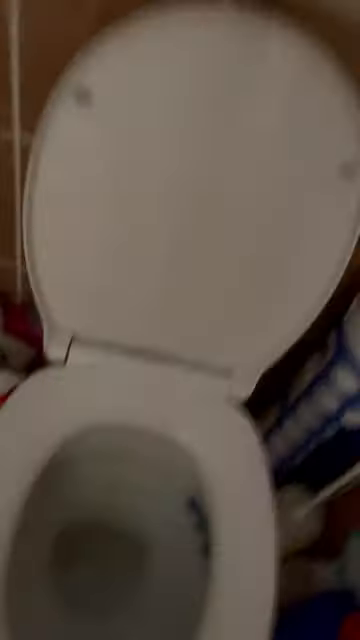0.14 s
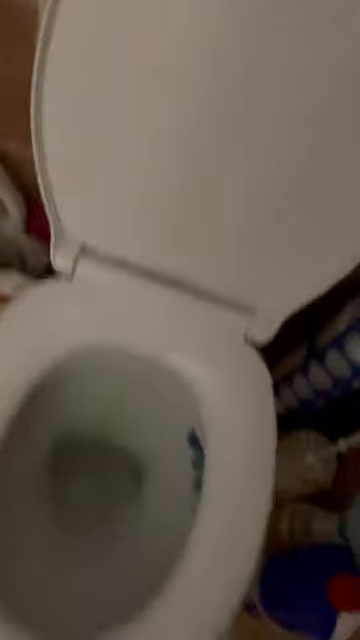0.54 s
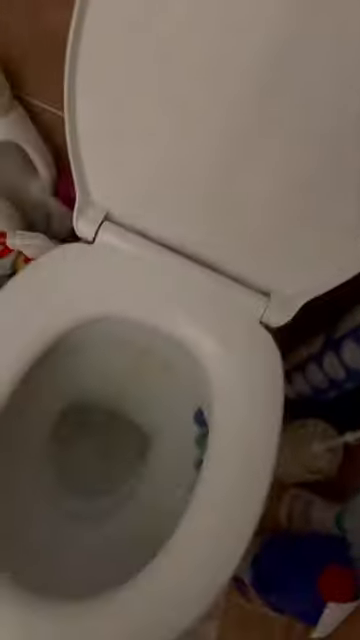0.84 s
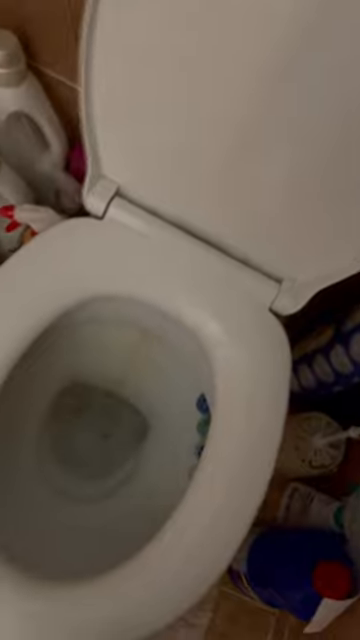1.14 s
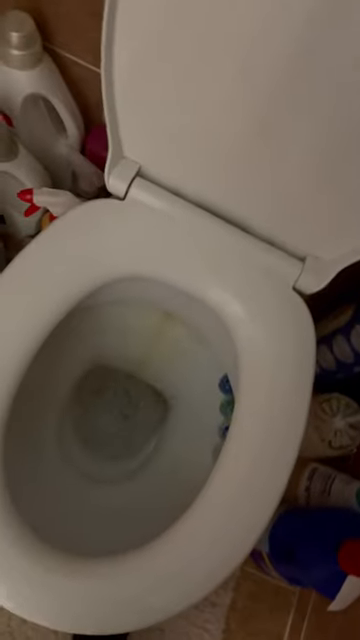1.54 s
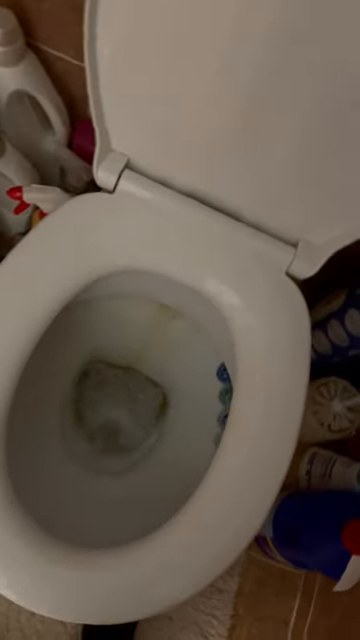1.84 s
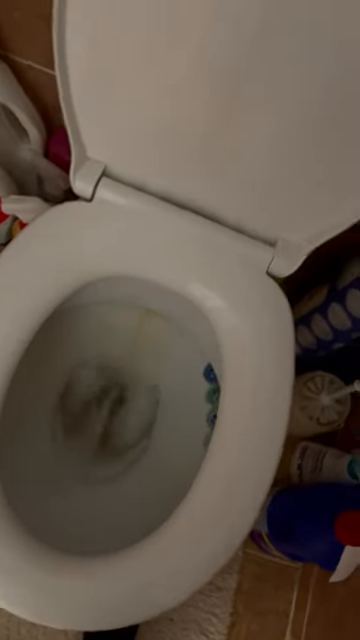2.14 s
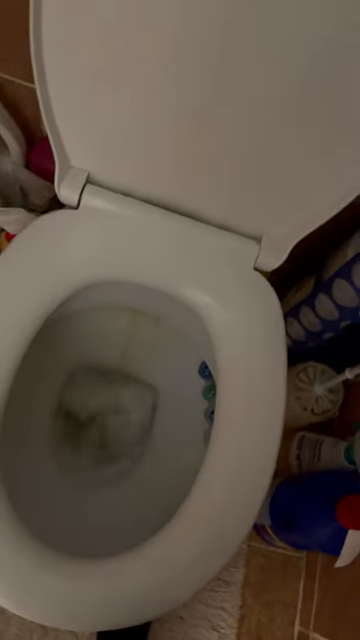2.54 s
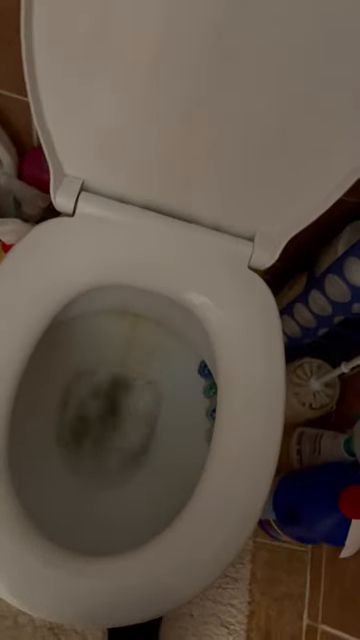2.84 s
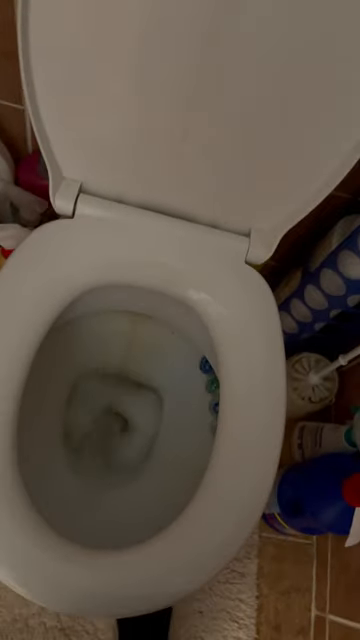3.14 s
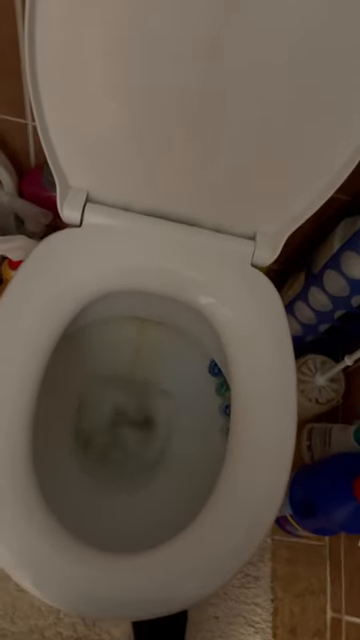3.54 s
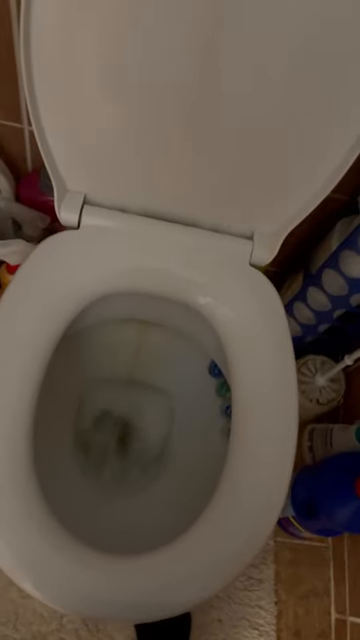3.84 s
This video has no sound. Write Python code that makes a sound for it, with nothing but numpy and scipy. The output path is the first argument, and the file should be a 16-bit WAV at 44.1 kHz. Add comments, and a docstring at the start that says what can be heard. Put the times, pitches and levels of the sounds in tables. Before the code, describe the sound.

Toilet flush heard up close, handle rattling and thumping before water gushes and churns in a bathroom

```python
"""A lever clicks and scrapes, then a toilet flushes in a small tiled bathroom, heard from just above the bowl.
Bursts of random impacts make the lever; decaying modes and short notes make the cistern's thumps and gulps.
The filling flush pipe sings as a wavering sine; coloured drops and rising chirps make the water spray from
the rim, splash and churn in the bowl. Big bubbles are swelling sines; room noise and a low rumble lie beneath."""
import sys
import numpy as np
from scipy import signal
from scipy.fft import rfft, irfft, next_fast_len
from scipy.io import wavfile
from scipy.ndimage import uniform_filter1d

SR = 44100
rng = np.random.default_rng(int(sys.argv[2]) if len(sys.argv) > 2 else 0)


def to_wav(sig):
    """Store sig (one row per channel, or 1-D mono) as 16-bit WAV at the path in sys.argv[1].

    Samples outside -1..1 are clipped; the rate is SR.
    """
    pcm = np.clip(np.atleast_2d(sig), -1, 1) * 32767
    pcm = np.round(pcm).astype(np.int16)
    wavfile.write(sys.argv[1], SR, pcm.T)  # frames by channels


N = 176400  # samples, 4 s

# Spectrum of water slapping. Each row: frequency in Hz, relative level in dB.
SLAP_COLOUR = [(500,-14),(800,5),(1400,-0.5),(2200,-1.5),(3000,-9.5),(6000,-15),(10000,-30)]


def undb(db):
    """A level in decibels is twenty times the logarithm of the amplitude gain returned."""
    return 10 ** (np.asarray(db) / 20)


def unit(x):
    """Dividing by the root mean square gives a signal unit effective amplitude."""
    return x / np.sqrt(np.mean(x ** 2) + 1e-20)


def curve(rows, column=1):
    """A slow gain envelope: levels in dB interpolated linearly over time, from rows of (s, dB, ..)."""
    rows = np.array(rows)
    return undb(np.interp(np.arange(N) / SR, rows[:, 0], rows[:, column]))


def colour(x, points):
    """Minimum-phase filtering: folding the cepstrum makes a causal response through (Hz, dB); rms 1."""
    size = next_fast_len(N + N // 10, real=True) * 2
    hz, db = np.array(points).T
    octave = np.log2(np.maximum(np.arange(size // 2 + 1) * SR / size, 1))
    beyond = np.abs(octave - np.clip(octave, np.log2(hz[0]), np.log2(hz[-1])))
    # outside the points the level falls 20 dB per octave, for two octaves
    level_db = np.interp(octave, np.log2(hz), db) - 20 * np.minimum(beyond, 2)
    cepstrum = irfft(np.log(undb(level_db)))
    cepstrum[1:size // 2] *= 2
    cepstrum[size // 2 + 1:] = 0
    response = np.exp(rfft(cepstrum))
    return unit(irfft(rfft(x, size) * response)[:N])


def noise(points):
    """White noise holds all frequencies equally; a filter gives it its colour."""
    return colour(rng.standard_normal(N), points)


def decay(t, t60):
    """Exponential decay, by 60 dB in t60 seconds."""
    return np.exp(-np.log(1000) * t / t60)


def ring(x, modes):
    """Modal synthesis: a force is convolved with decaying cosines, rows of (Hz, dB, t60 s)."""
    t = np.arange(SR) / SR
    response = sum(undb(db) * np.cos(2 * np.pi * hz * t) * decay(t, t60) for hz, db, t60 in modes)
    return signal.fftconvolve(x, response)[:N]


def walk(count):
    """Slow random fluctuation: smoothed random steps, count of them a second; rms 1."""
    step = SR // count
    steps = np.repeat(rng.standard_normal(N // step + 1), step)
    return unit(uniform_filter1d(steps, step)[:N])


def drops(rate, spread_db):
    """A Poisson-like shower: independent impulses, rate a second on average, of random sign and uneven size."""
    size = undb(spread_db * np.clip(rng.standard_normal(N), -2.5, 2.5))
    return (rng.random(N) < rate / SR) * size * rng.choice([-1, 1], N)


def chirps(rate, low_hz, high_hz, cycles, spread_db):
    """Bubble resonance: a crowd of decaying notes rising in pitch, each dying by 1/e in the given cycles."""
    glide = 0.053  # share of the starting pitch gained in one 1/e decay time
    out = np.zeros(N + SR)
    candidates = np.column_stack([rng.random((6000, 3)), rng.standard_normal(6000)])
    for at, pitch, keep, size in candidates:
        if keep < rate * N / SR / 6000:  # leaves about rate chirps a second
            hz = low_hz * (high_hz / low_hz) ** pitch
            age = np.arange(int(5 * cycles * SR / hz)) * hz / SR / cycles  # in decay times
            tone = np.sin(2 * np.pi * cycles * age * (1 + glide * age / 2))
            i = int(at * N)
            out[i:i + len(age)] += undb(spread_db * min(size, 2)) * hz * np.exp(-age) * tone
    return out[:N]


def room(x, wet_db):
    """Diffuse reverberation: direct sound plus decaying noise, whose channels differ most in mid register."""
    t = np.arange(SR // 2) / SR
    mid, side = rng.standard_normal((2, len(t)))
    side = signal.sosfilt(signal.butter(1, [450, 5000], "band", fs=SR, output="sos"), side)
    tail = mid + 0.58 * side * np.array([[1], [-1]])
    body = signal.sosfilt(signal.butter(2, 3000, fs=SR, output="sos"), tail)
    treble = tail - body
    tail = body * decay(t, t60=0.32) + treble * decay(t, t60=0.21)
    tail *= t > .003  # the tail starts 3 ms after the direct sound
    tail *= undb(wet_db) / np.sqrt(np.sum(tail ** 2) / 2)
    wet = signal.fftconvolve(x[None], tail, axes=1)[:, :N]
    return (x + wet) / np.sqrt(1 + undb(wet_db) ** 2)


def water():
    """Many small impacts and bubble notes merge: the pool churns and gurgles, drops splash, spray hits porcelain."""
    # Each row: time in seconds, churn level in dB, gurgle in dB, splash in dB, spray in dB.
    flow = [(.58,-69,-101,-74,-86),(.68,-44,-35,-47,-45.5),(.9,-42,-59,-53,-50.5),(1.12,-59,-56,-59.5,-51.5),(1.24,-45,-51,-54.5,-44),
            (1.42,-48,-51.5,-44.5,-45.5),(1.56,-49.5,-42,-42,-42.5),(1.66,-42.5,-36.5,-40,-43.5),(1.76,-43,-39.5,-43.5,-40),(1.86,-43.5,-36.5,-37,-37.5),
            (2.05,-40.5,-38,-39.5,-35),(2.3,-41,-34.5,-38.5,-37.5),(2.65,-42.5,-36,-38.5,-37.5),(3.05,-42,-37,-40.5,-40),(3.4,-43.5,-37,-39.5,-39.5),(4,-42.5,-34,-40,-40)]
    # Spectra of the four registers. Each row: frequency in Hz, relative level in dB.
    churn_colour = [(58,-10),(78,-4),(130,-3),(166,-16.5),(200,4),(228,-10),(258,9.5),(278,-9),(305,7.5),(350,-3.5),(420,-16.5),(700,-37.5)]
    gurgle_colour = [(330,-47.5),(450,-13.5),(505,-10),(540,-13),(730,0.5),(800,-1.5),(920,3),(1100,-3.5),(1400,-6),(1900,-20)]
    splash_colour = [(800,-17),(1500,-1),(2000,-0.5),(2350,2.5),(2750,-0.5),(3050,1.5),(3500,-2.5),(4300,-3),(6000,-13.5)]
    spray_colour = [(2500,-13),(4500,-5),(6000,-1),(8500,-2),(10400,2.5),(11300,-2),(12200,-11),(13600,-23),(15500,-63)]

    surge = undb(1.0 * walk(count=24))  # 1 dB rms, shared by all registers
    churn = colour(drops(rate=900, spread_db=2.0), churn_colour) * curve(flow, column=1)
    gurgle = chirps(rate=320, low_hz=446.2, high_hz=2036, cycles=5.1, spread_db=3)
    gurgle = colour(gurgle, gurgle_colour) * curve(flow, column=2)

    tinkle = unit(chirps(rate=430, low_hz=1374, high_hz=5160, cycles=10.6, spread_db=3.1))
    patter = unit(drops(rate=1300, spread_db=0.9)) + undb(-5.5) * tinkle
    splash = colour(patter, splash_colour) * curve(flow, column=3) * undb(0.38 * walk(count=50))

    fine_bubbles = unit(chirps(rate=600, low_hz=4000, high_hz=12530, cycles=10, spread_db=4.8))
    fizz = unit(drops(rate=1600, spread_db=5)) + undb(-2) * fine_bubbles
    spray = colour(fizz, spray_colour) * curve(flow, column=4) * undb(1.5 * walk(count=50))

    low = room(churn * surge, wet_db=-12.0) + room(gurgle * surge, wet_db=-2)
    return low + room(splash * surge, wet_db=-3.0) + room(spray * surge, wet_db=-3.0)


def big_bubbles():
    """Air pockets as resonators: each bursting bubble is a sine that swells and dies as its pitch rises; a low
    note of the cistern near 260 Hz is made the same way."""
    # Each row: time of the peak in seconds, pitch there in Hz, level in dB, swell time scale in seconds. The #
    # first row is the cistern's low note just after its thump at 0.866 s; the rest are bubbles.
    bubbles = [(0.871,260.4,-22.5,0.00695),(1.46,2020,-32,0.0044),(1.578,1780,-34,.006),(1.649,995,-25.5,0.0034),(1.794,1356,-22.5,0.0016),(1.831,867,-18.5,0.0031),(1.85,917,-23.5,0.0042),
               (1.881,4110,-21,0.0017),(2.065,924,-19,.0015),(2.078,945,-16.5,0.0034),(2.093,1153,-22,.003),(2.2535,908,-22.5,0.0019),(2.27,646,-28,.005),(2.578,102,-43,0.029),(2.806,2330,-28,0.0022),(2.837,1196,-26.5,0.0023),
               (2.897,645,-28.5,0.0048),(2.942,1020,-27,0.0065),(2.991,1016,-29,.003),(3.015,980,-23,.004),(3.048,964,-20.5,0.003),(3.068,2290,-17.5,0.0015),(3.079,1004,-24,0.0024),(3.081,1900,-26,.002),(3.285,885,-29,.006),(3.381,806,-25.5,0.0064),
               (3.45,958,-18.5,.0025),(3.619,2360,-27,0.0022),(3.666,525,-34,0.0042),(3.672,737,-30,0.0066),(3.672,297,-32.5,0.0087),(3.798,950,-17.5,0.0018),(3.859,920,-20.5,0.0014),(3.9,890,-33.5,.005)]
    out = np.zeros(N + SR)
    for at, hz, db, swell in bubbles:
        lead = int(4 * swell * SR)
        age = np.arange(-lead, int(8 * swell * SR)) / SR
        start = int(at * SR) - lead
        size = undb(db) / np.cosh(1.4 * age / swell)
        pitch = hz * (1 + 0.043 * np.tanh(age / swell / 2))
        out[start:start + len(age)] += size * np.sin(2 * np.pi * np.cumsum(pitch) / SR)
    return room(out[:N], wet_db=-7)


def splashes():
    """Impact noise: sheets of water slap the pool as dense drops under a sudden, decaying force."""
    # Each row: start in seconds, level in dB, 1/e decay time in seconds.
    slaps = [(1.455,-28.5,0.011),(1.572,-32.5,0.01),(1.789,-25.5,0.0081),(1.91,-39,0.012),(2.25,-26.5,0.016),(2.896,-25,0.008),(2.986,-28.5,0.018),(3.039,-26,0.0084),(3.069,-26,0.012)]
    t = np.arange(N) / SR
    force = sum(undb(db) * (t >= at) * np.exp(-np.abs(t - at) / length) for at, db, length in slaps)
    return room(force * colour(drops(rate=4000, spread_db=0.99), SLAP_COLOUR), wet_db=-5.5)


def cistern():
    """Forced resonance: as the valve opens, gulps of air excite the cavity and water thumps the tank's modes."""
    # Each row: time in seconds, impulse level in dB, full width at 1/e in seconds.
    thumps = [(.691,-16,0.0017),(0.7048,-14,0.0019),(0.764,-22.5,0.0015),(0.866,-30,0.0017),(1.036,-45.5,0.00086)]
    # Modes of cistern and pipe. Each row: frequency in Hz, level in dB, t60 in seconds.
    tank_modes = [(79.5,-28,0.73),(104.2,-10.5,0.29),(134,-13,0.29),(256,-16,1),(292.5,3,0.21),(327,2.5,0.41),(354,-13,0.83),(446.4,-11.5,0.46),(517,-15,0.86)]
    # Air in the valve. Each row: peak time in seconds, pitch in Hz, level in dB, standard deviation in seconds.
    gulps = [(0.67,1074,-23.5,0.0069),(0.69,930,-25,0.0034),(0.7055,904,-16,0.0031),(0.714,1018,-15,0.0039),(0.733,880,-25.5,0.0028),(0.866,860,-37,0.007),(1.03,1030,-47,0.0068)]
    # Air in the cistern. Each row: frequency in Hz, level in dB, t60 in seconds.
    cavity_modes = [(861,-10.5,0.21),(970,-18,0.15),(1050,-17.5,0.18),(1318,-15.5,0.11),(1475,-24.5,0.086),(1700,-29,0.11),(2020,-31,0.063),(2480,-36,0.11)]
    fill_s = 0.009  # integration time of the cavity's response

    t = np.arange(N) / SR
    push, gulp, air = np.zeros((3, N))
    for at, db, length in thumps:
        pulse = np.exp(-((t - at) / (length / 2)) ** 2)
        push += undb(db) * pulse / pulse.sum()
    for at, hz, db, length in gulps:
        size = undb(db) * np.exp(-.5 * ((t - at) / length) ** 2)
        gulp += size
        air += size * np.cos(2 * np.pi * hz * (t - at))
    for hz, db, t60 in cavity_modes:
        swell = signal.lfilter([1 / (fill_s * SR)], [1, -decay(1 / SR, t60)], gulp)
        air += undb(db) * swell * np.sin(2 * np.pi * hz * (t - gulps[0][0]))
    high_pass = signal.butter(4, 62, "high", fs=SR, output="sos")
    tank = signal.sosfilt(high_pass, ring(push, tank_modes))
    breath = undb(-20) * gulp * noise(SLAP_COLOUR[:-2])
    return room(tank, wet_db=-3) + room(air + breath, wet_db=-13.5)


def lever():
    """Stick-slip friction: gritty bursts as the handle catches and slips, sharp contacts and a ringing linkage."""
    # Each row: peak in seconds, knock level in dB, clack in dB, tick in dB, 1/e rise and decay in seconds.
    clicks = [(0.001,-55.5,-49,-36.5,0.001,0.021),(0.044,-44.5,-32,-32,0.002,0.014),(0.096,-34,-21.5,-33.5,0.0007,0.01),(0.224,-67,-45,-24,0.0003,0.0077),(0.26,-55,-38.5,-22.5,0.008,0.0059),
              (0.38,-62,-46.5,-39,0.0003,0.025),(0.459,-65,-53,-44,0.003,0.0093),(0.581,-47.5,-59,-60,0.0014,0.057),(0.626,-44,-43.5,-31,0.00044,0.017)]
    # Spectra of the lever's three parts. Each row: frequency in Hz, relative level in dB.
    knock_colour = [(150,-28),(450,8),(650,-3.5),(900,2.5),(1400,-13),(2200,-9),(4000,-43)]
    clack_colour = [(700,-12.5),(2000,1.5),(3200,3),(6000,0),(8000,-2),(10000,-34),(14000,-39)]
    tick_colour = [(2000,-28),(5000,-7),(7500,3),(10300,6.5),(12000,-4),(14000,-44)]
    # Sharp contacts in the linkage. Each row: start in seconds, level in dB.
    contacts = [(0.0225,-24),(.0435,-38),(.0477,-19.5),(0.2249,-18.5),(0.242,-25),(.2545,-33)]
    contact_s = 0.00044  # 1/e decay time
    # Small rings of the linkage. Each row: frequency in Hz, level in dB, t60 in seconds.
    linkage_modes = [(4680,-29,0.055),(6340,-39,0.046),(7300,-44,.04),(10300,-38,0.045),(10470,-28,0.05)]

    t, out, ticks = np.arange(N) / SR, np.zeros(N), np.zeros(N)
    colours = (knock_colour, clack_colour, tick_colour)
    parts = np.array([colour(drops(rate=8300, spread_db=5.9), c) for c in colours])
    for at, knock, clack, tick, rise, length in clicks:
        burst = np.exp(-np.abs(t - at) / np.where(t < at, rise, length))
        out += undb([knock, clack, tick]) @ parts * burst
        ticks += undb(tick) * burst
    snaps = sum(undb(db) * (t >= at) * np.exp(-np.abs(t - at) / contact_s) for at, db in contacts)
    out += noise(tick_colour) * snaps
    linkage = ring(ticks * rng.standard_normal(N), linkage_modes)
    return room(out + linkage, wet_db=-2)


def wavering_tone(hz):
    """Random modulation: a sine wanders by 24 Hz rms in pitch and by its own mean in amplitude; rms 1."""
    waver = 1 + walk(count=60)
    pitch = hz + 24 * walk(count=60)
    return unit(waver * np.sin(2 * np.pi * np.cumsum(pitch) / SR))


def pipe():
    """Air-column tone: air squeezed from the filling flush pipe sings one thin note with faint companions."""
    # Each row: time in seconds, level of the main note in dB.
    sing = [(1.1,-85),(1.16,-51),(1.3,-51),(1.41,-40.5),(1.45,-50),(1.6,-47),(2.0,-57)]
    # Each row: companion's frequency in Hz, level relative to the main note in dB.
    companions = [(840,-17),(1395,-6.5),(1530,-10.5)]
    voice = wavering_tone(1357) + sum(undb(db) * wavering_tone(hz) for hz, db in companions)
    return room(voice * curve(sing), wet_db=-11)


def handling_rumble():
    """Structure-borne noise: the hand-held microphone picks up a low rumble, here noise of varying level."""
    # Each row: time in seconds, level in dB.
    rumble_level = [(0,-47),(.1,-51),(.3,-58),(1.2,-88),(2.4,-73),(2.65,-58),(4,-59)]
    rumble_colour = [(24, -30), (32, -16), (41, -10.5), (55, -21.5), (120, -26.5)]  # Hz, dB
    return noise(rumble_colour) * curve(rumble_level)


def quiet_room():
    """Diffuse background: steady noise, mostly reverberant, fills the room."""
    # Each row: frequency in Hz, relative level in dB.
    quiet_colour = [(42,5),(100,-33),(400,-9),(2000,-17),(10000,-12),(15000,-70)]
    return undb(-62) * room(noise(quiet_colour), wet_db=12)


def scene():
    """Superposition: the pressures of all sources add, over a quiet room and faint handling rumble."""
    flush = water() + big_bubbles() + splashes() + cistern() + lever() + pipe()
    return flush + handling_rumble() + quiet_room()


def record(dry):
    """Interchannel difference: two microphone ports differ in phase and level; deepest bass and top are cut."""
    # Phase by which the left port leads. Each row: frequency in Hz, phase in radians.
    port_phase = [(0,0),(1600,.1),(2600,.6),(3900,.8),(4400,1.5),(4850,3.14),(5300,5.3),(6000,6.28),(7000,7.3),(9050,9.42),(11000,11.4),(11900,12.56),(15000,12.56)]
    # Right channel over left. Each row: frequency in Hz, level difference in dB.
    right_db = [(60,1.5),(200,1),(380,4.5),(700,5),(1000,1),(1300,-1),(2400,0.5),(4000,-0.5)]
    size = next_fast_len(N + N // 10, real=True) * 2
    f = np.arange(size // 2 + 1) * SR / size
    log_gain = np.log(undb(-np.interp(f, *np.array(right_db).T)))
    ratio = log_gain + 1j * np.interp(f, *np.array(port_phase).T)  # left over right
    halves = np.exp(np.array([ratio, -ratio]) / 2)
    ports = irfft(rfft(dry, size) * halves)[:, :N]
    ports = signal.sosfilt(signal.butter(4, 31, "high", fs=SR, output="sos"), ports)
    return signal.sosfilt(signal.ellip(8, .2, 70, 14800, fs=SR, output="sos"), ports)


dry = scene()
out = record(dry)
to_wav(out)
```